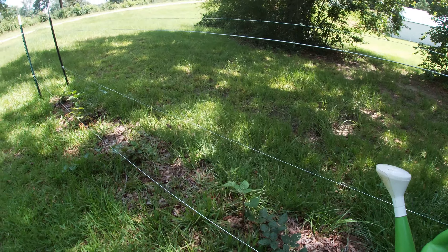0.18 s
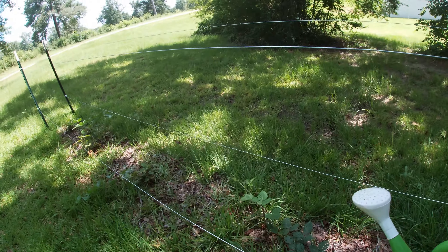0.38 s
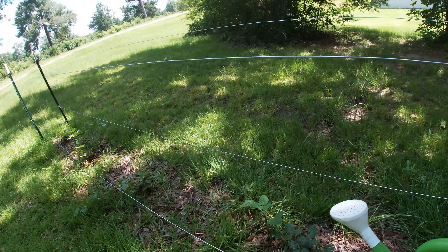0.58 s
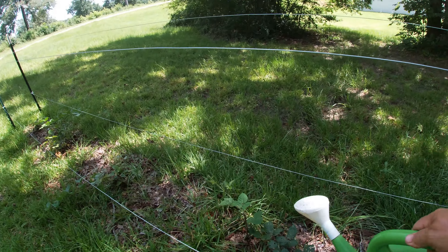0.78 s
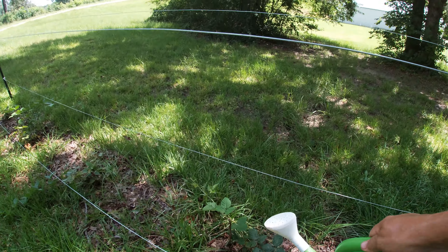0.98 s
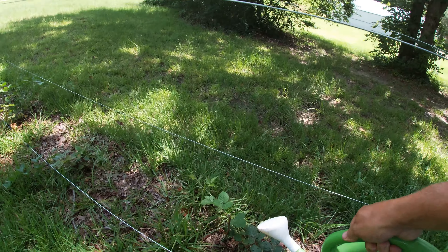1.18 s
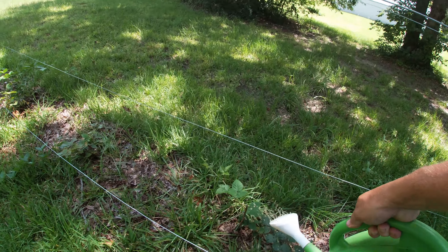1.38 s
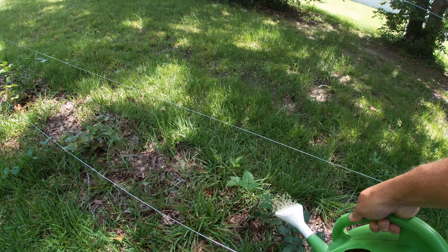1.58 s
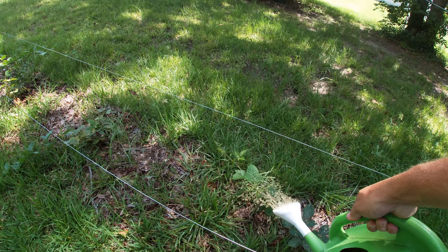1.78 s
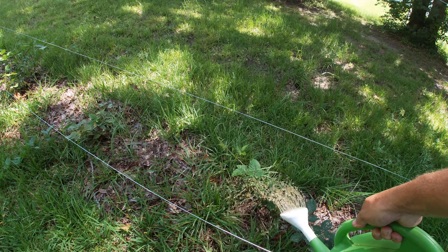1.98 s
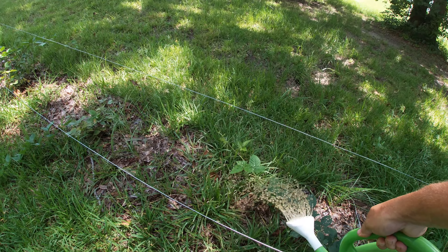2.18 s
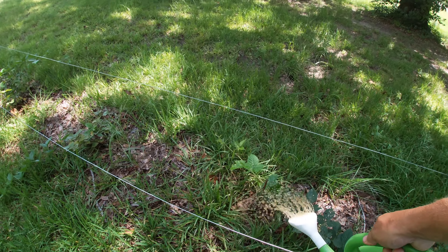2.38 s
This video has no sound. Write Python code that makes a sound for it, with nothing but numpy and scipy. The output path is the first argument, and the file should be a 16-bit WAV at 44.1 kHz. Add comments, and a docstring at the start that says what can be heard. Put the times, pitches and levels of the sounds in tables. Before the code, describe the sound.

A watering can sprinkles plants on a lawn, heard close from a body-worn microphone. Soft grass rustle and clothes brushing come first, with heavy low bumps at 0.2-0.6 s, a tiny rough rising squeak at 0.64 and a hollow plastic knock at 1.03. From about 1.4 water bubbles, then patter swells to the end, with low glugs at 1.8-2.0 and crisp leaf drops. Faint hiss, insects and slowly growing distant engine throughout.

```python
"""A soft outdoor hiss, thin high insects, a distant, slowly growing engine and a very faint patter start together.
A plastic watering can is carried over a lawn: noise bands rustle and brush, low lumps jolt the body-worn microphone.
A short, rough chirp squeaks, then the can knocks once: quick contacts set off dying sines with a crack of noise.
As the can is tipped the patter swells on grass and leaves: random clicks tick, and ring small resonators.
Water gurgles in the spout with rising sines, big drops snap on leaves, and air gulps into the can in low tones."""
import sys
import numpy as np
from scipy import signal
from scipy.fft import rfft, irfft
from scipy.io import wavfile

SR = 44100
rng = np.random.default_rng(int(sys.argv[2]) if len(sys.argv) > 2 else 0)


def unload_wav(signal):
    """Save mono or channel-first audio to the path in sys.argv[1] as 16-bit WAV at rate SR, clipped to [-1, 1]."""
    wavfile.write(
        sys.argv[1],
        SR,
        np.round(np.clip(np.atleast_2d(signal).T, -1, 1) * 32767).astype(np.int16),
    )


N = 105840
T = np.arange(N) / SR  # time in seconds


def from_db(db):
    """Decibels to gain."""
    return 10 ** (np.asarray(db) / 20)


def rms_one(x):
    """Scale to an average strength (rms) of 1."""
    return x / np.sqrt(np.mean(x ** 2) + 1e-20)


def level(rows):
    """Gain over time from rows of seconds and dB; the first and last values hold outside the rows."""
    return from_db(np.interp(T, *np.transpose(rows)))


def filtered(x, hz, kind, order=2):
    """Butterworth filter: keeps the lows, the highs or a band."""
    edges = np.clip(hz, 5, 0.47 * SR)
    return signal.sosfilt(signal.butter(order, edges, kind, fs=SR, output="sos"), x + 1e-18)


def coloured(x, spectrum):
    """Filter with the given shape of Hz and dB that never sounds ahead of its input (minimum phase)."""
    hz, db = np.transpose(spectrum)
    size = 2 * N
    f = np.maximum(np.arange(N + 1) * SR / size, 1)
    cepstrum = irfft(np.log(from_db(np.interp(np.log(f), np.log(hz), db))))
    # Folding the second half onto the first makes the filter minimum-phase.
    cepstrum[1:N] *= 2
    cepstrum[N + 1:] = 0
    return irfft(rfft(x, size) * np.exp(rfft(cepstrum)))[:N]


def noise():
    """White noise."""
    return rng.standard_normal(N)


def narrow(hz, width_hz, db):
    """A narrow band of noise around a centre."""
    return from_db(db) * rms_one(filtered(noise(), [hz - width_hz / 2, hz + width_hz / 2], "band"))


def drift(rate_hz):
    """Random wander, spread 1, no faster than about the given rate."""
    return rms_one(filtered(rng.standard_normal(2 * N), rate_hz, "low")[N:])


def burst(start, attack, hold, release):
    """Envelope: straight attack, then an exponential release that begins hold seconds after the start."""
    rise = np.clip((T - start) / attack, 0, 1)
    return rise * np.exp(-np.maximum(T - start - hold, 0) / release)


def ping(start, hz, t60, rise=0):
    """A sine that falls 60 dB in t60 seconds; its pitch may rise by a share per second."""
    age = np.maximum(T - start, 0)
    return np.sin(2 * np.pi * hz * age * (1 + rise * age / 2)) * from_db(-60 * age / t60)


DROP_SPREAD_DB = 5.5  # typical spread of the click sizes


def impacts(rate):
    """Random clicks of uneven size and random sign, at an average rate per second."""
    hit = np.flatnonzero(rng.random(N) < rate / SR)
    draws = rng.random((N, 2))[hit]
    size_db = DROP_SPREAD_DB * np.minimum(-np.log(draws[:, 0]), 3.5)
    clicks = np.zeros(N)
    clicks[hit] = from_db(size_db) * np.sign(draws[:, 1] - 0.5)
    return clicks


def ringing(rate, low_hz, high_hz, cycles, count=28):
    """Random clicks dealt to resonators that each fall 60 dB in some cycles; rms 1."""
    out = 0
    for hz in np.geomspace(low_hz, high_hz, count):
        keep = from_db(-60 * hz / (cycles * SR))  # share left after one sample
        turn = 2 * np.pi * hz / SR  # angle per sample
        feedback = [1, -2 * keep * np.cos(turn), keep * keep]
        out = out + signal.lfilter([0, np.sin(turn)], feedback, impacts(rate / count) + 1e-18)
    return rms_one(out)


# Colour of the outdoor hiss. Each row: frequency in Hz, relative level in dB.
AIR_COLOUR = [(340, -14), (750, -18), (1050, -22.5), (1600, -23), (2100, -26.5), (2600, -17), (3100, -19),
              (3900, -15.5), (5300, -18.5), (6500, -18), (7500, -23.5), (10500, -30), (11100, -47),
              (12400, -38.5), (15500, -60)]
# Loudness of the hiss. Each row: time in seconds, level in dB.
AIR_LOUDNESS = [(0, -52.5), (.55, -55.5), (1.0, -54.5), (1.2, -56.5), (2.4, -51.5)]
# High insects. One row: centre in Hz, width in Hz, level in dB.
INSECT_BAND = (9650, 190, -73)
# Colour of the walk through grass. Each row: frequency in Hz, relative level in dB.
RUSTLE_COLOUR = [(150, -15), (1000, -3), (1900, -8), (2700, -4.5), (4500, -8), (7000, -9), (9700, -13),
                 (11300, -27.5), (15000, -27)]
# Loudness of the rustle before it flickers. Each row: time in seconds, level in dB.
RUSTLE_LOUDNESS = [(0, -53), (.28, -50), (.38, -57.5), (.65, -67.5), (.85, -59.5), (1.02, -64), (1.2, -83)]
# Resonances of clothes brushing by the microphone. Each row: centre in Hz, width in Hz, relative level in dB.
BRUSH_BANDS = [(544, 310, -1.5), (1290, 140, -10.5), (2630, 94, -17.5)]
# Gain of the brushing. Each row: time in seconds, gain in dB.
BRUSH_GAIN = [(0, -101), (.12, -51.5), (.24, -46), (.31, -41), (.38, -60), (.5, -94)]


def surroundings(flicker_db=2.0):
    """Outdoor hiss and insects are noise; flickering grass noise and brushing clothes fade with the walk."""
    air = level(AIR_LOUDNESS) * rms_one(filtered(coloured(noise(), AIR_COLOUR), 150, "high"))
    flicker = from_db(flicker_db * drift(79))
    rustle = level(RUSTLE_LOUDNESS) * flicker * rms_one(coloured(noise(), RUSTLE_COLOUR))
    brush = level(BRUSH_GAIN) * sum(narrow(*band) for band in BRUSH_BANDS)
    return air + rustle + brush + narrow(*INSECT_BAND)


# Steady tones of the engine. Each row: frequency in Hz before it wavers, level in dB before growth and flutter.
ENGINE_LINES = [(75.4, -58.5), (123, -63.5), (151, -62), (174, -64.5), (199, -64)]
# Growth of the engine. Each row: time in seconds, gain in dB.
ENGINE_GROWTH = [(0, -2), (.8, -0.5), (2.4, 0.4)]
# Faint whirr. One row: centre in Hz, width in Hz, level in dB before growth.
WHIRR_BAND = (1325, 80, -72)
RUMBLE_DB = -58.5  # before growth


def engine(waver=0.0063, flutter_db=2):
    """A far engine: low tones waver together in pitch and singly in level, over a dull rumble and a whirr."""
    turns = np.cumsum(1 + waver * drift(3)) / SR
    lines = 0
    for hz, db in ENGINE_LINES:
        gain = np.sqrt(2) * from_db(db + flutter_db * drift(2))  # a sine's peak is root 2 times its rms
        lines = lines + gain * np.sin(2 * np.pi * (hz * turns + rng.random()))
    dull = filtered(filtered(noise(), 208, "low", order=4), 16, "high")
    rumble = from_db(RUMBLE_DB) * rms_one(dull)
    return level(ENGINE_GROWTH) * (lines + rumble + narrow(*WHIRR_BAND))


# Flow out of the rose. Each row: time in seconds, gain in dB.
FLOW_GAIN = [(1.3, -18), (1.5, -10), (1.64, -8.5), (1.73, -6.5), (1.92, -5.5), (2.04, -1), (2.1, -2.5),
             (2.24, -1), (2.4, -1.5)]
# The spray meets broad leaves. Each row: start in seconds, extra gain in dB, length in seconds.
LEAF_SPATTERS = [(1.759, 10, 0.057), (1.878, 8.5, 0.016), (2.007, 5, 0.059), (2.13, 6, 0.03),
                 (2.22, 5.5, 0.022), (2.36, 3.5, 0.03)]
# Colour of the drops. Each row: frequency in Hz, relative level in dB.
PATTER_COLOUR = [(320, 2.5), (450, -5.5), (720, -1.5), (1300, -7), (1650, 2.5), (2050, -9), (4200, -10.5),
                 (5400, -3.5), (6400, -6), (7500, -16), (8600, -6), (9500, -15), (11300, -25), (15000, -34)]
# Small bubbles, first in the filling spout, then in the rose. Each row: time in seconds, level in dB.
BUBBLE_LOUDNESS = [(1.43, -71), (1.51, -54), (1.59, -61.5), (1.63, -52), (1.74, -61.5), (1.77, -47.5),
                   (1.91, -61), (1.94, -52), (2.05, -47.5), (2.09, -66), (2.15, -51), (2.4, -62.5)]
TICK_DB, TINKLE_DB = -50.5, -56  # before the flow gain
DROPS_PER_S, TINKLES_PER_S, BUBBLES_PER_S = 1500, 390, 1400
TINKLE_LOW_HZ, TINKLE_HIGH_HZ, TINKLE_CYCLES = 3630, 9140, 45  # cycles to fall 60 dB
BUBBLE_LOW_HZ, BUBBLE_HIGH_HZ, BUBBLE_CYCLES = 651, 2430, 18.3


def patter():
    """Countless drops: clicks spread over bands tick, and clicked resonators tinkle and bubble."""
    extra_db = sum(db * burst(s, 0.0019, length, 0.0023) for s, db, length in LEAF_SPATTERS)
    flow = level(FLOW_GAIN) * from_db(extra_db)
    shared = impacts(DROPS_PER_S)
    edges = np.geomspace(170, 15000, 14)
    blades = 0
    for low, high in zip(edges, edges[1:]):
        # Each band has the shared clicks and about as many of its own.
        clicks = shared + impacts(DROPS_PER_S)
        blades = blades + filtered(clicks * noise(), [low, high], "band")
    ticks = from_db(TICK_DB) * rms_one(coloured(blades, PATTER_COLOUR))
    bright = ringing(TINKLES_PER_S, TINKLE_LOW_HZ, TINKLE_HIGH_HZ, TINKLE_CYCLES)
    tinkles = from_db(TINKLE_DB) * rms_one(coloured(bright, PATTER_COLOUR))
    small = ringing(BUBBLES_PER_S, BUBBLE_LOW_HZ, BUBBLE_HIGH_HZ, BUBBLE_CYCLES)
    return flow * (ticks + tinkles) + level(BUBBLE_LOUDNESS) * small


# Jolts of the microphone. Each row: start in seconds, level in dB, length in seconds, lowest Hz,
# highest Hz of the turbulence.
JOLT_ROWS = [(0.194, -31, 0.064, 10, 163), (.303, -15, 0.027, 12, 216), (0.332, -17.5, 0.041, 26, 145),
             (0.388, -18, 0.023, 66, 165), (0.41, -20.5, 0.04, 34, 146), (.552, -23.5, 0.0207, 25, 165),
             (0.577, -19.5, 0.032, 19, 124)]
# Low rumble of the moving microphone. Each row: time in seconds, level in dB.
RUMBLE_LOUDNESS = [(.12, -64), (.28, -36.5), (.46, -35), (.51, -40), (.56, -30), (.63, -33), (.68, -46.5),
                   (.95, -71)]
# Scrape of the hardest jolt. One row: start in seconds, level in dB, length in seconds.
SCRAPE_ROW = (.3075, -32, 0.018)
JOLT_ATTACK_S, JOLT_RELEASE_S = 0.0068, 0.0098
SWAY_DB, SCUFF_DB = -2, -20.5  # next to the turbulence
SCUFF_REACH = 2.3  # top of the scuff, as a multiple of the turbulence's top


def jolts():
    """Each jolt is low turbulence, a swing and a fainter scuff; the hardest also scrapes, and a rumble joins."""
    low_noise = filtered(filtered(noise(), 91.4, "low", order=4), 32, "high")
    out = level(RUMBLE_LOUDNESS) * rms_one(low_noise)
    for s, db, length, low_hz, high_hz in JOLT_ROWS:
        swirl = filtered(noise(), high_hz, "low", order=4)
        # Dividing by its own strength evens out the peaks.
        strength = np.sqrt(np.abs(signal.hilbert(swirl)) ** 2 + 2 * np.var(swirl))
        even = rms_one(swirl / strength)
        scuff = from_db(SCUFF_DB) * rms_one(filtered(noise(), high_hz * SCUFF_REACH, "low", order=3))
        sway = from_db(SWAY_DB) * np.sin(2 * np.pi * (T - s) / length)
        shape = filtered(burst(s, JOLT_ATTACK_S, length * 0.85, JOLT_RELEASE_S), high_hz, "low")
        lump = filtered((even + scuff + sway) * shape, low_hz, "high")
        # Scale so that the jolt's energy matches its level held for its length.
        out = out + from_db(db) * lump * np.sqrt(length * SR / np.sum(lump ** 2))
    s, db, length = SCRAPE_ROW
    rasp = rms_one(filtered(noise(), [380, 760], "band"))
    return out + from_db(db) * burst(s, 0.00071, length, JOLT_RELEASE_S) * rasp


SQUEAK_START_S, SQUEAK_LENGTH_S, SQUEAK_DECAY_S, SQUEAK_DB = 0.636, 0.031, 0.015, -39.5
SQUEAK_START_HZ, SQUEAK_GLIDE_HZ_PER_S = 4330, 19200
SQUEAK_HALF_WIDTH_HZ = 670  # how far the roughness reaches to either side of the pitch


def squeak():
    """A rough, narrow chirp that glides up as it dies: slow noise carried on a rising tone."""
    age = np.clip(T - SQUEAK_START_S, 0, 2 * SQUEAK_LENGTH_S)
    phase = 2 * np.pi * np.cumsum(SQUEAK_START_HZ + SQUEAK_GLIDE_HZ_PER_S * age) / SR
    rough = filtered(noise() + 1j * noise(), SQUEAK_HALF_WIDTH_HZ, "low", order=6)
    fade = burst(SQUEAK_START_S, 0.0012, 0, SQUEAK_DECAY_S)
    stop = burst(SQUEAK_START_S, 0.0012, SQUEAK_LENGTH_S, 0.0035)
    return from_db(SQUEAK_DB) * fade * stop * rms_one(np.real(rough * np.exp(1j * phase)))


# Contacts of the knock. Each row: start in seconds, gain in dB, lowest strongly driven frequency in Hz.
KNOCK_CONTACTS = [(1.028, -36.5, 895), (1.0335, -27, 570), (1.0426, -34.5, 148), (1.054, -38.5, 150)]
# Ringing tones of the can before its pitch bends. Each row: frequency in Hz, relative level in dB,
# time in seconds to fall 60 dB.
CAN_TONES = [(225.5, 1, 0.14), (316.6, -0.5, 0.12), (638, 2.5, 0.064), (742, 5, 0.023), (880, -4.5, 0.019),
             (1226, -10, 0.029), (1616, -13, 0.047), (2000, -23, 0.03), (2420, -12, 0.066),
             (3190, -14, 0.051), (4080, -13.5, 0.037)]
CAN_BEND_PER_S, CAN_BEND_S = 2.2, 0.019  # rise as a share of pitch per second, and for how long
CAN_ROUGH = 0.3  # depth of the unsteadiness
CRACK_DB, CRACK_DECAY_S = -12, 0.011  # level next to the ring


def knock():
    """Quick contacts ring the hollow plastic can, each with a brief crack; the rough ring bends upward."""
    # Time that speeds up after the second contact bends every tone together.
    bend = CAN_BEND_PER_S * np.clip(T - KNOCK_CONTACTS[1][0], 0, CAN_BEND_S)
    bent_time = np.cumsum(1 + bend) / SR
    out = 0
    for s, db, low_hz in KNOCK_CONTACTS:
        age = np.maximum(bent_time - np.interp(s, T, bent_time), 0)
        ring = 0
        for k, (hz, tone_db, t60) in enumerate(CAN_TONES):
            fading = from_db(tone_db + rng.normal(0, 1) - 60 * age / t60)
            drive = hz ** 2 / (hz ** 2 + low_hz ** 2)
            ring = ring + fading * drive * (-1) ** k * np.sin(2 * np.pi * hz * age)
        crack_noise = rms_one(filtered(noise(), [450, 2900], "band", order=3))
        crack = crack_noise * burst(s, 0.00044, 0, CRACK_DECAY_S)
        out = out + from_db(db) * (ring * (1 + CAN_ROUGH * drift(250)) + from_db(CRACK_DB) * crack)
    return out


# Gurgles in the spout. Each row: start in seconds, gain in dB, starting pitch in Hz,
# time in seconds to fall 60 dB.
GURGLE_ROWS = [(1.604, -41, 1464, 0.056), (1.649, -39.5, 3280, 0.021), (1.651, -43, 1325, 0.058),
               (1.681, -38.5, 1170, 0.041), (1.862, -44, 698, 0.12), (1.952, -43, 670, 0.059),
               (1.993, -44.5, 632, 0.14), (2.035, -45, 1028, 0.18), (2.153, -43, 1700, 0.098),
               (2.224, -40, 1546, 0.069), (2.245, -45.5, 649, 0.2), (2.31, -41.5, 1620, 0.051)]
BUBBLE_RISE_PER_S = 0.73  # share of the starting pitch
BUBBLE_ROUGH = 0.4  # depth of the unsteadiness
GURGLE_ATTACK_S = 0.0014


def gurgles(splash_db=-9):
    """Big bubbles open with a wet splash, ring unsteadily and rise in pitch as water runs through the spout."""
    out = 0
    for s, db, hz, t60 in GURGLE_ROWS:
        fade_in = np.clip((T - s) / GURGLE_ATTACK_S, 0, 1)
        ring = ping(s, hz, t60, BUBBLE_RISE_PER_S) * fade_in * (1 + BUBBLE_ROUGH * drift(320))
        splash = narrow(hz, hz / 2, splash_db) * burst(s, GURGLE_ATTACK_S, 0, t60 / 6)
        out = out + from_db(db) * (ring + splash)
    return out


# Loudest single drops. Each row: start in seconds, gain in dB, shared by snap and ring.
BIG_DROPS = [(1.7585, -32), (1.7862, -39), (1.823, -36.5), (1.885, -45), (2.0062, -33), (2.022, -34),
             (2.046, -38.5), (2.148, -38), (2.203, -36), (2.223, -29), (2.2647, -33), (2.3095, -34),
             (2.358, -32), (2.3665, -31.5), (2.376, -37)]
LEAF_HZ, LEAF_T60_S = 5510, 0.017  # typical pitch; time to fall 60 dB
SNAP_DECAY_S, SNAP_DB = 0.0024, 8.5  # SNAP_DB: extra gain


def drops():
    """Big drops snap on a leaf, which rings for an instant, each at a slightly different pitch."""
    snaps = np.sign(noise()) * sum(from_db(db) * burst(s, 0.0004, 0, SNAP_DECAY_S) for s, db in BIG_DROPS)
    rings = 0
    for s, db in BIG_DROPS:
        hz = LEAF_HZ * np.exp(rng.normal(0, 0.086))
        rings = rings + from_db(db) * ping(s, hz, LEAF_T60_S)
    bright_snaps = coloured(filtered(snaps, [3500, 9500], "band"), PATTER_COLOUR)
    return from_db(SNAP_DB) * bright_snaps + 0.5 * rings


# Gulps of air into the can. Each row: start in seconds, gain in dB, starting pitch in Hz.
GLUG_ROWS = [(1.765, -43, 284), (1.825, -40.5, 287), (1.874, -35, 218.5), (1.955, -38, 196.5),
             (2.02, -39, 306)]
GLUG_ATTACK_S, GLUG_T60_S = 0.012, 0.22  # T60: time to fall 60 dB


def glugs():
    """Air gulps into the hollow can once the water runs: each gulp is one big, low bubble, rising in pitch."""
    out = 0
    for s, db, hz in GLUG_ROWS:
        fade_in = np.clip((T - s) / GLUG_ATTACK_S, 0, 1)
        out = out + from_db(db) * ping(s, hz, GLUG_T60_S, BUBBLE_RISE_PER_S) * fade_in
    return out * (1 + BUBBLE_ROUGH * drift(60))


def scene():
    """All sources at one microphone."""
    carrying = jolts() + knock() + squeak()
    water = patter() + drops() + gurgles() + glugs()
    background = engine() + surroundings()
    return (carrying + water + background)[None]


def record(dry):
    """The top is cut steeply: 60 dB down from 15500 Hz upward."""
    return signal.sosfilt(signal.cheby2(14, 60, 15500, fs=SR, output="sos"), dry)


dry = scene()
out = record(dry)
unload_wav(out)
```